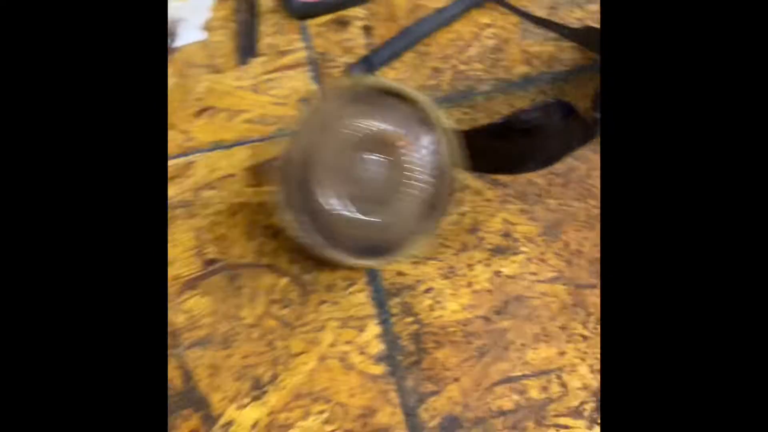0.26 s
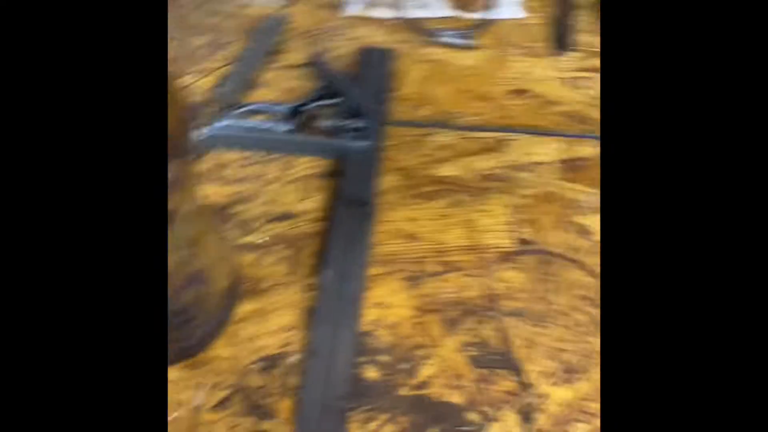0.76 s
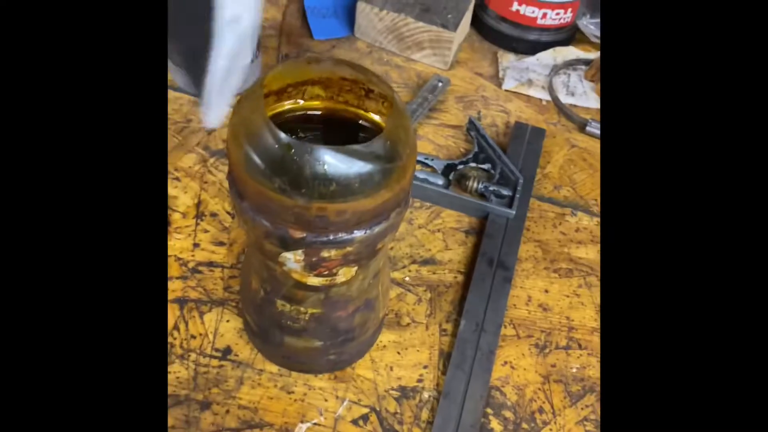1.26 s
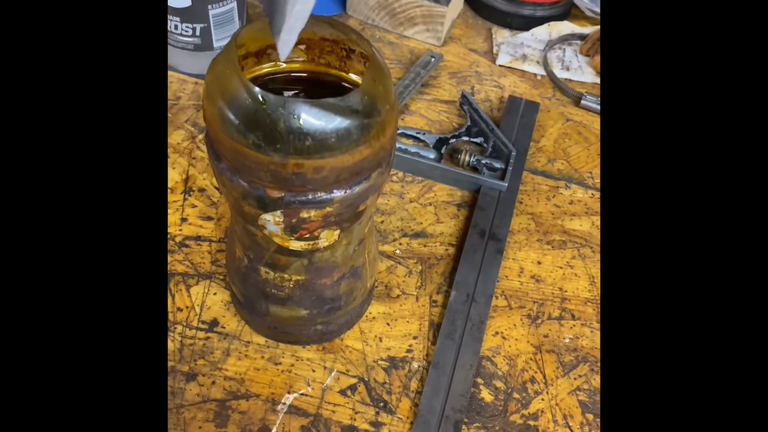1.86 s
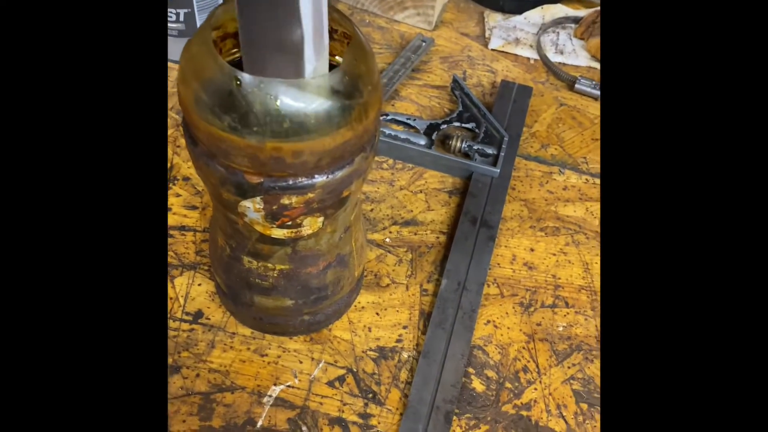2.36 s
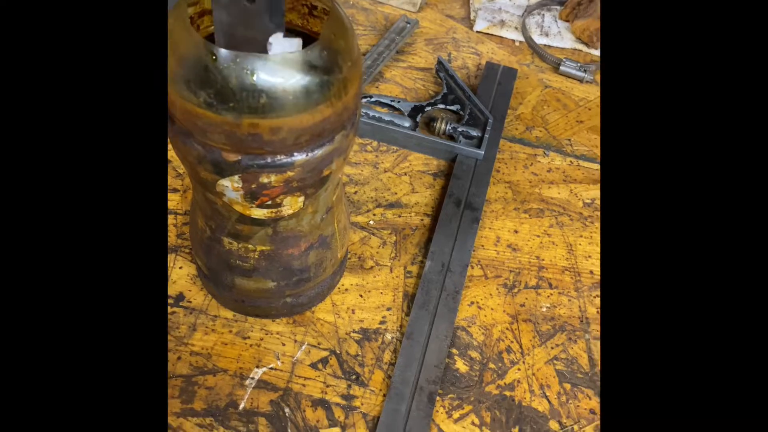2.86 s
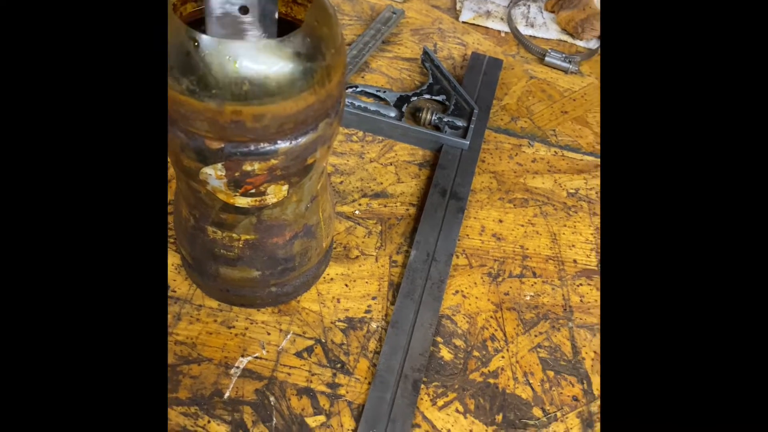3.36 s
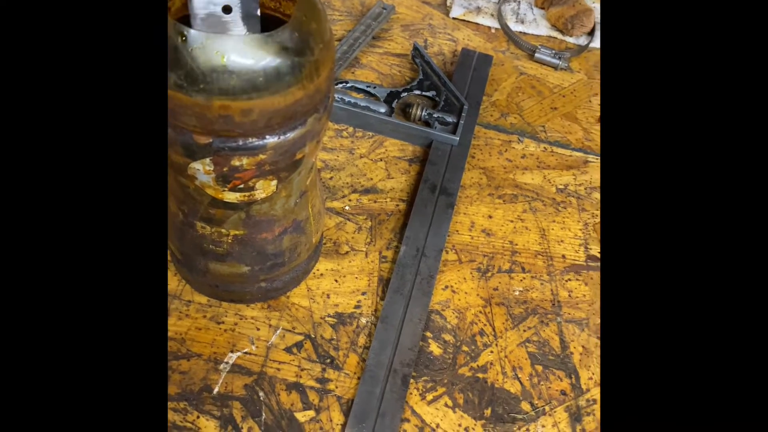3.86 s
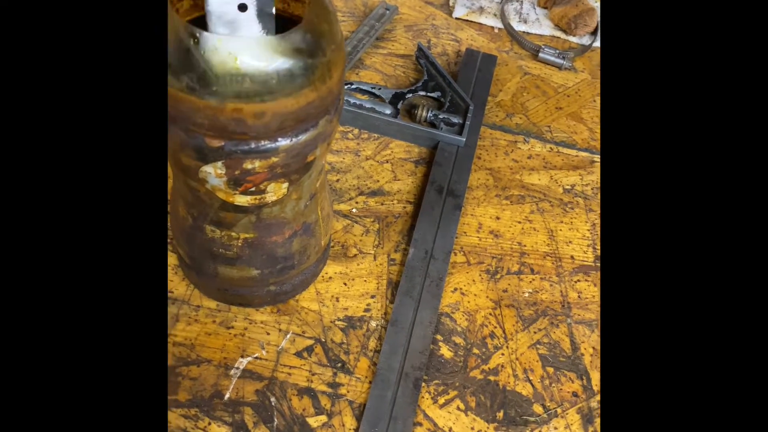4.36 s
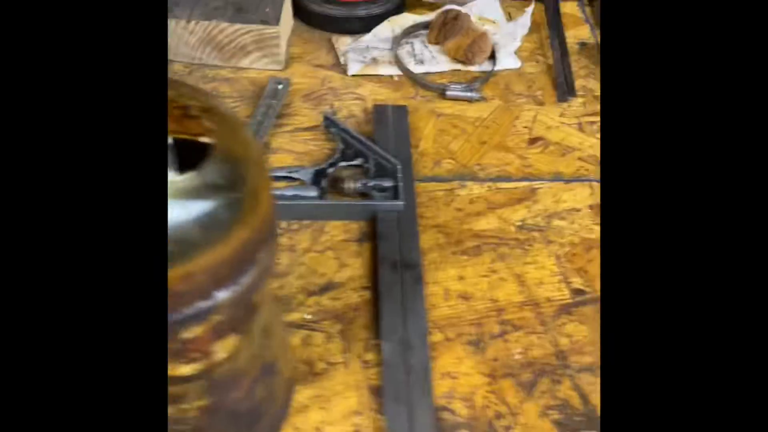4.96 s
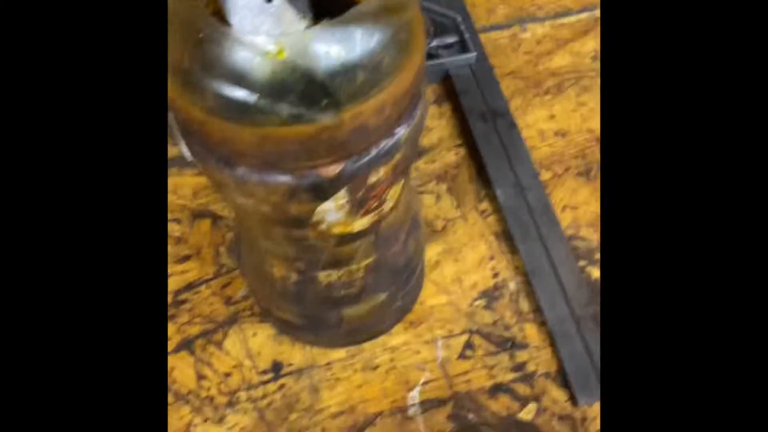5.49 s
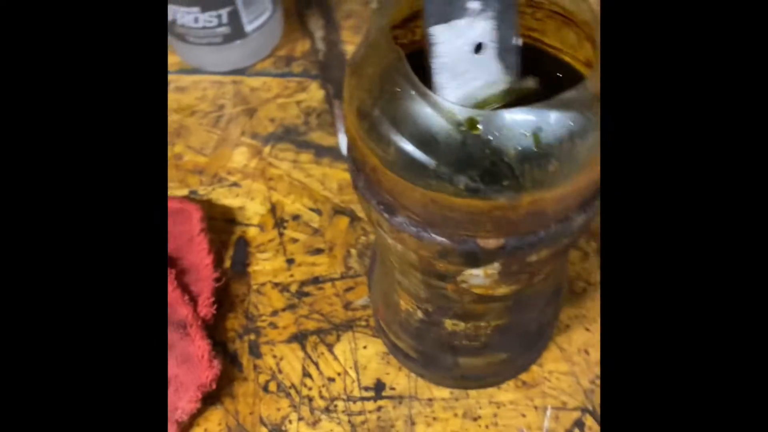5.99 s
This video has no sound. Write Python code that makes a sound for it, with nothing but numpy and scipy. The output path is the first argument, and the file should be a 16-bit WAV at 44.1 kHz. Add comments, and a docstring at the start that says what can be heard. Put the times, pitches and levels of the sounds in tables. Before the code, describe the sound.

Close to a hand-held microphone in a small workshop, a plastic lid lands on wood with sharp hollow knocks, then skids, rolls to the right and settles. For a moment only a low electrical hum and a soft fan remain. Then, slightly to the right, a steel blade touches a jar with small ticks, one deep bump through the bench and a few short, bright clinks, ending in faint rustling and light taps.

```python
"""Lid and blade in a workshop

A hollow plastic lid drops on a wooden bench, bounces, rolls off to the right and wobbles to rest.
Then a steel blade is let down into a jar of liquid, bumping the bottom and ticking against the neck.
Each contact is a cluster of tiny impacts that rings the modes of plastic, wood, glass or steel.
Heard close by on a hand-held phone with two microphone ports, over the small shop's fan and mains hum."""
import sys
import numpy as np
from scipy import signal
from scipy.fft import rfft, irfft, next_fast_len
from scipy.io import wavfile
from scipy.ndimage import uniform_filter1d, map_coordinates

SR = 44100
rng = np.random.default_rng(int(sys.argv[2]) if len(sys.argv) > 2 else 0)


def to_wav(s):
    """Save 16-bit WAV."""
    ch = np.atleast_2d(s).T  # columns
    pcm = np.round(np.clip(ch, -1, 1) * 32767)  # PCM
    wavfile.write(sys.argv[1], SR, pcm.astype(np.int16))


N = 274743

# fan and room noise: frequency_hz, density_db
AIR_SPECTRUM = [(25, -99), (60, -72), (100, -65), (180, -76.5), (270, -73.5), (400, -80.5), (700, -83.5),
                (1000, -87.5), (1900, -94.5), (3000, -91.5), (4900, -101), (5500, -110), (8000, -112),
                (11500, -120), (14000, -140)]
# noise power common to both ports: frequency_hz, share
AIR_COMMON = [(60, 1), (200, 0.99), (500, 0.83), (900, 0.612), (2000, 0.053), (3000, 0.76), (6000, 0.68),
              (9500, 1)]
# side the noise leans to (pan is always left minus right): frequency_hz, pan_db
AIR_PAN = [(100, -0.5), (300, 3.5), (700, 3), (1400, 2), (2400, 0)]
# mains and motor tones: pitch_hz, level_db, waver_db
HUM_TONES = [(119.96, -40.5, 0.5), (86.5, -51.5, 4), (209, -73.5, 8), (243.2, -60, 4), (287.3, -57.5, 3.5),
             (350.5, -69.5, 2.5), (480.4, -67.5, 5), (605, -65.5, -1)]
# deep bumps through the bench: start_s, level_db, pitch_hz, t60_s
BENCH_BUMPS = [(2.902, -30.5, 61.2, 0.36), (3.22, -31, 43.2, 0.18), (3.385, -41, 53.6, 0.098),
               (3.557, -12.5, 90, 0.078), (3.596, -22, 63, 0.15), (3.97, -43, 59.5, 0.11),
               (4.058, -37, 60.5, 0.11), (4.298, -26, 54.6, 0.054)]
# brief rustles and slides: start_s, length_s, level_db, centre_hz, width_hz
RUSTLE_PUFFS = [(1.349, 0.2, -46.5, 3500, 1390), (3.909, 0.028, -42, 10700, 3970),
                (4.022, 0.1, -66, 10400, 6040), (4.284, 0.026, -54, 11300, 5000),
                (4.854, 0.08, -61.5, 9850, 6000), (5, 0.45, -64.5, 3260, 3020),
                (5.252, 0.16, -67.5, 10200, 8000), (5.559, 0.18, -64.5, 8440, 7100),
                (5.705, 0.41, -68, 3420, 3040), (6.078, 0.12, -59.5, 9520, 7000),
                (6.158, 0.14, -60.5, 4700, 4000)]

# modes of the jar, its base and the blade: pitch_hz, level_db, t60_s
JAR_MODES = [(910, -6, .02), (1085, 2, .05), (1135, 0, .03), (1240, -5, .025), (1370, 3, .03),
             (1520, -2, .022), (1680, -6, .015)]
BASE_MODES = [(195, 4.5, 0.073), (273, 5, 0.046), (376, -1.5, 0.044), (580, 5, 0.019), (870, -2.5, 0.011)]
STEEL_LOW_MODES = [(2010, -10, .015), (2350, 0, .04), (2530, 0, .04), (2680, -3, .04), (2930, -2, .05)]
STEEL_HIGH_MODES = [(3500, -6, .015), (3740, 0, .02), (3930, 0, .022), (4150, 2, .026), (4400, -2, .015)]
EDGE_MODES = [(5200, -3, .004), (6100, 0, .005), (7200, -3, .003), (8300, -3, .004), (10200, -3, .002),
              (13000, -10, .002)]
# blade on jar: time_s, contact_ms, jar_db, base_db, steel_low_db, steel_high_db, edge_db,
# favoured_jar_hz, favoured_steel_low_hz, favoured_steel_high_hz
BLADE_TICKS = [(2.89, 6.1, -54.5, -48.5, -58.5, -67, -75, 1204, 2780, 4000),
               (3.172, 12, -46.5, -39.5, -47.5, -60, -53, 1100, 2570, 4000),
               (3.373, 7.9, -31.5, -42, -42.5, -43, -42, 1150, 2320, 3730),
               (3.388, 8.3, -35, -42, -53.5, -58.5, -71, 1100, 2410, 4040),
               (3.426, 8.8, -42.5, -38.5, -63, -57, -56, 1270, 2350, 4000),
               (3.547, 6, -37.5, -43, -41, -39.5, -47.5, 1220, 2530, 3660),
               (3.553, 6.5, -35, -22, -47, -59, -45.5, 970, 2530, 3700),
               (3.566, 12, -53, -24.5, -46, -59, -52, 900, 2950, 3720),
               (3.582, 16, -42, -30, -51.5, -66, -65, 900, 2950, 4360),
               (3.6, 16, -56.5, -32, -64, -75, -68, 892, 2930, 4020),
               (3.918, 12, -36, -58, -37, -32, -31.5, 1395, 2450, 4130),
               (3.972, 6.6, -42, -34.5, -61, -63, -70, 1110, 2600, 4100),
               (4.038, 4.3, -35.5, -66, -43, -36.5, -38, 1330, 2440, 4050),
               (4.053, 6, -39.5, -33, -35, -40, -37, 1220, 2600, 4150),
               (4.089, 7.5, -49, -61, -63, -66, -58, 1100, 2570, 4150),
               (4.163, 12, -46, -49, -61, -58, -63.5, 1090, 2400, 4200),
               (4.286, 6.4, -35, -45, -37, -30.5, -33.5, 1130, 2624, 4200),
               (4.299, 6, -38, -40, -42, -38.5, -60, 1117, 2580, 4220),
               (4.309, 2.25, -43, -43, -58, -62, -39, 1082, 2510, 4240),
               (4.325, 4.2, -30, -35.5, -56.5, -49, -30, 1188, 2420, 4260),
               (4.506, 3.1, -58, -55, -68.5, -67, -61, 1224, 2930, 3960),
               (4.889, 38, -64, -57, -70.5, -68.5, -70, 1200, 2350, 4000),
               (4.916, 11, -50, -63, -66.5, -68, -68, 1440, 2370, 4000),
               (5.609, 6.2, -53, -65, -64.5, -57, -57, 1200, 2720, 4030),
               (5.648, 3.5, -65.5, -55, -51, -52.5, -48, 1210, 2700, 4300),
               (5.91, 9.7, -42, -51.5, -62, -65, -49.5, 1190, 2930, 4130),
               (5.929, 14, -45, -51, -51.5, -45.5, -52, 1290, 2950, 4050),
               (5.969, 3.7, -42, -40, -78, -58, -65, 1250, 2360, 4020),
               (6.121, 9.4, -47, -47, -68, -58, -86, 1210, 2620, 4200)]
# the touching spot shifts along the blade edge: time_s, favoured_hz
EDGE_SPOT = [(3.5, 5560), (4.28, 6200), (4.32, 10590), (5.65, 8800), (5.9, 5760)]

# modes of the bench and of the lid's parts: pitch_hz, level_db, t60_s
BENCH_MODES = [(175, 4, 0.092), (228, 7.5, 0.038), (290.6, -3, 0.03), (358, 2, 0.03), (452, -5.5, 0.15)]
CUP_MODES = [(678.2, 3.5, 0.27), (709.5, 7, 0.079), (609, -5.5, 0.04), (737, -7, 0.032), (861, -4, 0.017),
             (1055, -2.5, 0.015)]
WALL_MODES = [(1080, -3, .02), (1400, 0, .018), (1620, 0, .03), (1705, 3, .045), (1870, 3, .04),
              (2050, 1, .04), (2150, -2, .025)]
RIM_MODES = [(2480, -8, .025), (2705, -4, .06), (2890, 0, .045), (3150, -3, .02)]
CRACK_MODES = [(3960, -3, .005), (4600, -2, .008), (5500, -3, .004), (6500, -3, .003), (7600, 0, .0025),
               (9200, -4, .002), (12500, -14, .002)]
# lid knocks and skids: time_s, contact_ms, cup_db, wall_db, rim_db, crack_db
LID_KNOCKS = [(0.033, 1.43, -18.5, -14.5, -23, -29), (0.034, 6.44, -15.5, -15.5, -35, -25.5),
              (0.212, 3.95, -13.5, -24, -28, -26.5), (0.257, 6.1, -30, -38, -32.5, -36),
              (0.268, 10.8, -47, -30.5, -27.5, -27.5), (0.291, 20, -27, -38, -32, -33.5),
              (0.315, 17, -68, -48.5, -40, -37), (0.343, 6.5, -27, -28, -35, -31),
              (0.353, 11, -18, -40, -37.5, -30), (0.378, 7.1, -27, -42, -30, -50),
              (0.416, 8.4, -20.5, -51.5, -33, -36), (0.457, 0.8, -23, -73.5, -18, -8.5),
              (0.478, 6.5, -45.5, -45, -56, -47), (0.506, 14.3, -37, -56.5, -43, -46),
              (0.568, 2.8, -33.5, -33.5, -31, -32.5), (0.606, 6.9, -36, -36.5, -34, -35),
              (0.63, 9.9, -37.5, -39.5, -39, -51), (0.687, 6.9, -35.5, -37.5, -34, -32),
              (0.748, 7.2, -28.5, -38, -29.5, -36), (0.76, 11.5, -28, -29, -32.5, -55),
              (0.788, 4.5, -30.5, -38, -28.5, -35), (0.902, 10.6, -47.5, -41, -36.5, -35.5),
              (0.917, 11.2, -29.5, -32, -34, -49), (0.962, 10, -37.5, -40, -31, -38),
              (1.032, 8.1, -34, -36.5, -33, -39), (1.052, 8.3, -26.5, -27.5, -33, -32),
              (1.072, 4.5, -34, -27.5, -27.5, -40), (1.156, 3.1, -40, -29, -55, -28),
              (1.161, 7.5, -24.5, -23.5, -27, -67), (1.18, 5.8, -37, -29, -40, -56),
              (1.211, 13, -63, -60, -43, -43), (1.245, 6.6, -26.5, -29.5, -31, -36),
              (1.309, 3.2, -37.5, -37, -46, -43), (1.356, 2.34, -37.5, -30.5, -43, -59),
              (1.399, 14.4, -59.5, -52.5, -39, -42)]
# lid rolling on its edge: time_s, cup_db, wall_db, rim_db, bench_db
ROLL_LEVELS = [(0.23, -47, -61.5, -64, -55), (0.27, -48, -46.5, -42.5, -40.5),
               (0.33, -43.5, -46, -37.5, -41), (0.374, -48.5, -41, -33, -37.5),
               (0.44, -36, -53.5, -51.5, -38.5), (0.54, -37, -50.5, -46.5, -43),
               (0.6, -41, -51, -47.5, -44.5), (0.66, -35, -52, -42.5, -38), (0.72, -53, -50, -40.5, -50),
               (0.77, -44.5, -42.5, -44.5, -43), (0.82, -47, -48, -49, -36), (0.88, -41.5, -58, -51.5, -55),
               (0.94, -39, -38, -47, -48), (0.99, -56, -54, -40.5, -43), (1.05, -41, -50, -45, -58),
               (1.1, -45, -55, -44, -49), (1.14, -49, -46, -49, -45), (1.22, -42, -43.5, -38, -54),
               (1.3, -53, -47, -43.5, -44.5), (1.37, -36, -47.5, -41.5, -44.5),
               (1.46, -71, -56, -43.5, -61)]
# the lid tips and another spot meets the wood:
# time_s, favoured_wall_hz, favoured_rim_hz, favoured_crack_hz
LID_SPOT = [(0.1, 1590, 3120, 5230), (0.21, 1800, 2900, 5100), (0.26, 1960, 2520, 5600),
            (0.3, 1680, 2600, 5630), (0.39, 1750, 2700, 5540), (0.42, 1947, 3100, 5300),
            (0.45, 1890, 2910, 7890), (0.72, 2040, 2926, 7380), (0.75, 1920, 3200, 3770),
            (0.92, 2020, 2890, 3800), (0.96, 1710, 2850, 3900), (1.04, 1820, 2700, 3870),
            (1.075, 1760, 2680, 3900), (1.16, 2120, 2880, 3800), (1.24, 1640, 2750, 3800),
            (1.31, 1850, 2950, 3750), (1.36, 1590, 3080, 3750)]
# the lid's path past the phone: time_s, pan_db, cup_left_lead_ms, rim_left_lead_ms
LID_TRAVEL = [(0.03, 7.5, 0.74, -0.033), (0.22, 4, 0.86, -0.034), (0.25, -1, 0.62, 0.025),
              (0.37, 5.5, 1, 0.2), (0.41, 0, -0.37, -0.06), (0.75, -4.5, -0.031, 0.006),
              (1.4, -4, 0.038, 0.086)]
# the cup rings shorter as the lid lies flatter: time_s, ring_time_share
CUP_RING_SHARE = [(0.8, 0.83), (0.9, 0.54)]
SQUEAL_HZ, CUP_NOTE_HZ = 2704, 678
# notes of the skidding edge: start_s, length_s, pitch_hz, level_db, left_lead_ms
SKID_NOTES = [(0.268, 0.044, SQUEAL_HZ, -20.5, .13), (0.28, 0.023, 3930, -38, .1),
              (0.268, 0.031, 4960, -40, .1), (0.269, 0.027, 5530, -39.5, .1),
              (0.27, 0.019, 6150, -36, 0.091), (0.322, 0.028, SQUEAL_HZ, -33, 0.11),
              (0.349, 0.03, SQUEAL_HZ, -29, 0.12), (0.372, 0.035, SQUEAL_HZ, -29.5, .13),
              (0.459, 0.088, CUP_NOTE_HZ, -28, 0.016), (0.585, 0.11, CUP_NOTE_HZ, -34.5, 0.024),
              (0.606, 0.028, 1902, -38.5, 0.0024), (0.629, 0.03, 1892, -38, 0.0024),
              (0.779, 0.051, CUP_NOTE_HZ, -29, 0.02), (0.906, 0.032, 2046, -34, 0.002),
              (0.928, 0.06, 1700, -45.5, 0.002)]

# brief 12-13 kHz fizz that the phone's audio coding adds on each knock: centre_hz, level_db, t60_s
TOP_FIZZ_BANDS = [(12000, 0, .002), (13300, 0, .002)]
# phase between the microphone ports: frequency_hz, left_lead_rad
PORT_LEAD = [(0, 0), (300, -.2), (700, -.9), (1100, -2.0), (1550, -.4), (2000, -.4), (2500, -2.5),
             (3000, -3.0), (4100, -3.9), (5000, -3.4), (5900, -4.5), (7000, -4.0), (7900, -3.9),
             (8700, -3.3), (11500, -2.9), (13500, -2.3), (14500, -1.2), (16200, -.8)]

RIM_PAN_SHARE = 0.64  # the rim leans less to one side than cup and wall
# fall in a mode's level with its distance from the favoured pitch
LID_DB_PER_OCT, CRACK_DB_PER_OCT, ROLL_DB_PER_OCT = 61.5, 31, 41
JAR_DB_PER_OCT, STEEL_DB_PER_OCT, EDGE_DB_PER_OCT = 40, 55, 29.5


def undb(db):
    """Decibels to gain."""
    return 10 ** (np.asarray(db) / 20)


def at(table, s):
    """Columns of a curve read at times s."""
    times, *columns = np.transpose(table)
    return [np.interp(s, times, c) for c in columns]


def over_hz(table):
    """A curve read across the spectrum on a log frequency axis."""
    hz, value = np.transpose(table)
    return np.interp(np.log(np.fft.rfftfreq(N, 1 / SR) + 1), np.log(hz + 1), value)


def walk(per_s):
    """Smooth random drift with a spread near 1."""
    hold = int(SR / per_s)
    steps = np.repeat(rng.standard_normal(N // hold + 1), hold)
    return 1.72 * uniform_filter1d(uniform_filter1d(steps, hold), hold)[:N]


def filtered(x, order, hz, kind="lowpass"):
    """Maximally flat filter."""
    return signal.sosfilt(signal.butter(order, hz, kind, fs=SR, output="sos"), x)


def place(x, pan_db):
    """Mono to left and right."""
    return x * undb(np.array([pan_db, -pan_db]).reshape(2, -1) / 2)


def add(out, s, sound):
    """Mix a sound in at time s."""
    i = int(s * SR)
    n = min(sound.shape[1], N - i)
    out[:, i:i + n] += sound[:, :n]


def ring(modes, favoured_hz=None, ring_share=1, db_per_oct=None):
    """Modes answer one click; the struck spot may favour those near one pitch."""
    t = np.arange(SR // 8) / SR
    out = 0
    for hz, db, t60 in modes:
        if favoured_hz:
            db = db - db_per_oct * abs(np.log2(hz / favoured_hz))
        decay = np.exp(-np.log(1000) * t / (t60 * ring_share))
        out = out + undb(db) * np.sin(2 * np.pi * hz * t) * decay
    return out


def radiated(x, modes):
    """A part sends out little below its lowest mode."""
    return filtered(x, 4, 0.9 * min(modes)[0], "highpass")


def chatter(contact_ms, spread_db=8.5):
    """A contact is a cluster of tiny uneven impacts that swells and dies away."""
    progress = np.arange(SR // 10) / SR / (contact_ms / 1000)
    grit = rng.standard_normal(len(progress)) * undb(spread_db * rng.standard_normal(len(progress)))
    swell = np.exp(-((progress - 1.08) / 0.56) ** 2 / 2)
    return (grit * swell)[progress < 2.8]


def blows(times, contact_ms, parts, detune):
    """Each blow rings every part; grip and contact shift the modes a little from blow to blow."""
    # a part: modes, level_db, favoured_hz (0 for none), db_per_oct, pan_db, left_lead_ms, ring_share
    out = np.zeros((2, N))
    for i, (s, ms) in enumerate(zip(times, np.clip(contact_ms, 1, 35))):
        force = chatter(ms)
        start_s = s - .6 * ms / 1000
        shifts = detune * rng.standard_normal(len(parts))
        shifts[0] /= 3  # the main note nearly holds its pitch
        for shift, (modes, *columns) in zip(shifts, parts):
            settings = (np.broadcast_to(c, times.shape)[i] for c in columns)
            level_db, favoured_hz, db_per_oct, pan_db, lead_ms, ring_share = settings
            modes = [(hz * (1 + shift), db, t60) for hz, db, t60 in modes]
            response = ring(modes, favoured_hz, ring_share, db_per_oct)
            sound = radiated(signal.fftconvolve(force, response), modes)
            loudest_rms = np.sqrt(uniform_filter1d(sound ** 2, size=200).max())
            left, right = place(sound * undb(level_db) / loudest_rms, pan_db)
            add(out[:1], start_s - lead_ms / 2000, left[None])
            add(out[1:], start_s + lead_ms / 2000, right[None])
    return out


def fan_air(swell_db=.5, flicker_db=0.52):
    """Fan and room noise all round the phone: octave bands swell together and flicker alone."""
    both, left, right = rfft(rng.standard_normal((3, N)))
    common = np.clip(over_hz(AIR_COMMON), 0, 1)
    ports = np.sqrt(common) * both + np.sqrt(1 - common) * np.array([left, right])
    ports *= place(undb(over_hz(AIR_SPECTRUM)) * np.sqrt(SR / 2), over_hz(AIR_PAN))
    octave = np.log2(np.fft.rfftfreq(N, 1 / SR) / 20 + 1e-9)
    swell = swell_db * walk(0.93)
    out = 0
    for k in range(11):
        band = np.cos(np.pi / 2 * np.clip(octave - k, -1, 1)) ** 2
        out += irfft(ports * band, N) * undb(swell + flicker_db * walk(11.0))
    return out


def hum():
    """Mains and motor tones in the centre, each wavering in level."""
    t = np.arange(N) / SR
    out = 0
    for hz, db, waver_db in HUM_TONES:
        amplitude = np.sqrt(2) * undb(db + waver_db * walk(hz / 14))
        out += amplitude * np.sin(2 * np.pi * (hz * t + rng.random()))
    return out


def room(x, level_db=-20.5, t60_s=.28):
    """Walls and shelves add a short, thin, diffuse tail behind the direct sound."""
    t = np.arange(SR // 2) / SR
    own, common = rng.standard_normal((2, len(t))), rng.standard_normal(len(t))
    tail = common + filtered(own - common, 1, 8000)  # the ports hear the same top end
    tail *= np.exp(-np.log(1000) * t / t60_s) * np.clip(t / 0.01, 0, 1)
    tail = filtered(tail, 2, [1800, 7000], "bandpass")
    tail /= np.sqrt((tail ** 2).sum(axis=1, keepdims=True))
    return x + undb(level_db) * signal.fftconvolve(x, tail, axes=1)[:, :N]


def rustles():
    """Faint rustles and slides in the centre: short patchy puffs of hiss."""
    out, patchy = np.zeros((2, N)), undb(2.7 * walk(74))
    for s, length_s, db, centre_hz, width_hz in RUSTLE_PUFFS:
        n = int(length_s * SR)
        grit = rng.standard_normal(SR // 2) * undb(3.1 * rng.standard_normal(SR // 2))
        hiss = filtered(grit, 3, [centre_hz - width_hz / 2, centre_hz + width_hz / 2], "bandpass")
        puff = hiss[:n] * patchy[:n] * np.hanning(n)
        add(out, s, place(puff * undb(db) / puff.std(), 0))
    return out


def bench_bumps(push_ms=2.5):
    """Soft heavy contacts carry through the bench: a few low cycles, alike at both ports."""
    out, push = np.zeros((2, N)), np.hanning(int(push_ms * SR / 1000))
    for s, db, hz, t60 in BENCH_BUMPS:
        response = ring([(hz, db, t60), (1.88 * hz, db + 0.5, 0.29 * t60)])
        add(out, s, place(signal.fftconvolve(response, push / push.sum()), 0))
    return filtered(out, 2, 45, "highpass")


def blade_ticks(jar_pan_db=-8.5, jar_lead_ms=0.46, steel_pan_db=-7.5, steel_lead_ms=-0.006):
    """Right of the phone, the blade touches the jar's neck and bottom; glass and steel both ring."""
    s, ms, jar_db, base_db, low_db, high_db, edge_db, jar_hz, low_hz, high_hz = np.transpose(BLADE_TICKS)
    parts = [(JAR_MODES, jar_db, jar_hz, JAR_DB_PER_OCT, jar_pan_db, jar_lead_ms, 1),
             (BASE_MODES, base_db, 0, 0, 0, 0, 1),
             (STEEL_LOW_MODES, low_db, low_hz, STEEL_DB_PER_OCT, steel_pan_db, steel_lead_ms, 1),
             (STEEL_HIGH_MODES, high_db, high_hz, STEEL_DB_PER_OCT, steel_pan_db, steel_lead_ms, 1),
             (EDGE_MODES, edge_db, *at(EDGE_SPOT, s), EDGE_DB_PER_OCT, 0, 0, 1)]
    return blows(s, ms, parts, detune=.011)  # they hold their pitch better than plastic


def lid_singing(waver_db=2):
    """The skidding edge makes single modes sing: near-pure notes that swell, waver and fade."""
    out, waver = np.zeros((2, N)), undb(waver_db * walk(90))
    for s, length_s, hz, db, lead_ms in SKID_NOTES:
        t = np.arange(int(length_s * SR)) / SR
        shape = np.interp(t / length_s, [0, 0.072, .7, 1], [0.092, 0.99, 0.5, 0])
        shape *= waver[int(s * SR):][:len(t)]
        port_t = t + np.array([[1], [-1]]) * lead_ms / 2000
        note = np.sqrt(2) * undb(db) * shape * np.sin(2 * np.pi * (hz * port_t + rng.random()))
        add(out, s, note * place(0.89, RIM_PAN_SHARE * at(LID_TRAVEL, s)[0]))
    return out


def lid_rolling(ring_share=0.79, wobble_depth=.01):
    """The lid's rough edge patters on the wood and keeps modes ringing; the wobble bends their pitch."""
    n = 2 * SR
    t = np.arange(n) / SR
    cup_db, wall_db, rim_db, bench_db = at(ROLL_LEVELS, t)
    (tipping_s, _), (flat_s, flat_ring_share) = CUP_RING_SHARE
    flat = np.interp(t, [tipping_s, flat_s], [0, 1])
    # modes, level_db, gain, ring_time_share, favoured_hz
    parts = [(BENCH_MODES, bench_db, 1, ring_share, 0),
             (CUP_MODES, cup_db, 1 - flat, 1, 0),
             (CUP_MODES, cup_db, flat, flat_ring_share, 0),
             (WALL_MODES, wall_db, 1 - flat, ring_share, 1900),
             (WALL_MODES, wall_db, flat, ring_share, 1730),
             (RIM_MODES, rim_db, 1, ring_share, 2900),
             (CRACK_MODES, rim_db - 7.5, 1, ring_share, 0)]
    wobbling_index = np.cumsum(1 + wobble_depth * flat * walk(27)[:n])
    bumpy_db = 2.8 * walk(89.83)[:n]
    out = 0
    for modes, db, gain, share, favoured_hz in parts:
        grit = rng.standard_normal(n) * undb(4.9 * rng.standard_normal(n) + 2.5 * walk(60)[:n] + bumpy_db)
        patter = signal.fftconvolve(grit, ring(modes, favoured_hz, share, ROLL_DB_PER_OCT))[:n]
        bent = map_coordinates(radiated(patter, modes), [wobbling_index], order=1, mode="mirror")
        out += gain * undb(db) * bent / bent.std()
    out *= (t > ROLL_LEVELS[0][0]) & (t < ROLL_LEVELS[-1][0])
    out = filtered(out, 4, 7700)  # patter is softer than a blow
    return np.pad(place(out, RIM_PAN_SHARE * at(LID_TRAVEL, t)[0]), ((0, 0), (0, N - n)))


def lid_knocks():
    """The lid bounces from left to right; the bench answers in step with its hollow cup note."""
    s, ms, cup_db, wall_db, rim_db, crack_db = np.transpose(LID_KNOCKS)
    wall_hz, rim_hz, crack_hz = at(LID_SPOT, s)
    pan_db, cup_lead_ms, rim_lead_ms = at(LID_TRAVEL, s)
    parts = [(CUP_MODES, cup_db, 0, 0, pan_db, cup_lead_ms, *at(CUP_RING_SHARE, s)),
             (BENCH_MODES, cup_db - 10.5, 0, 0, 0, 0, 1),
             (WALL_MODES, wall_db, wall_hz, LID_DB_PER_OCT, pan_db, 0, 1),
             (RIM_MODES, rim_db, rim_hz, LID_DB_PER_OCT, RIM_PAN_SHARE * pan_db, rim_lead_ms, 1),
             (CRACK_MODES, crack_db, crack_hz, CRACK_DB_PER_OCT, 0, 0, 1),
             (TOP_FIZZ_BANDS, crack_db - 10.5, 0, 0, 0, 0, 1)]  # the phone's fizz follows the crack
    return blows(s, ms, parts, detune=.015)


def scene():
    """Lid, blade and bench close by, with the shop's hum and fan behind."""
    contacts = lid_knocks() + lid_rolling() + lid_singing() + blade_ticks()
    contacts = filtered(contacts, 3, 134, "highpass")  # small bodies send out little bass
    contacts = filtered(contacts, 2, 10400)  # plastic and wet steel give little above this
    return room(contacts) + bench_bumps() + rustles() + hum() + fan_air()


def record(dry, drive=1.2, top_hz=16300):
    """The phone's two ports shift the phase against each other; peaks are rounded and the top is cut."""
    n = next_fast_len(N + SR // 4)
    hz, radians = np.transpose(PORT_LEAD)
    lead = np.interp(np.fft.rfftfreq(n, 1 / SR), hz, radians)
    ports = irfft(rfft(dry, n) * np.exp(.5j * np.outer([1, -1], lead)), n)[:, :N]
    rounded = np.tanh(drive * ports) / drive
    return signal.sosfilt(signal.ellip(8, .2, 70, top_hz, fs=SR, output="sos"), rounded)


dry = scene()
out = record(dry)
to_wav(out)
```